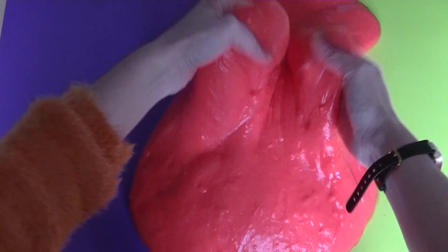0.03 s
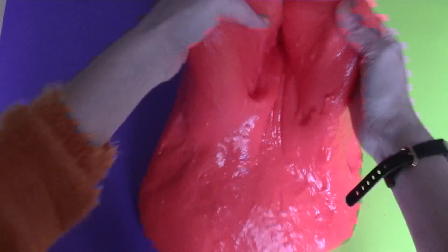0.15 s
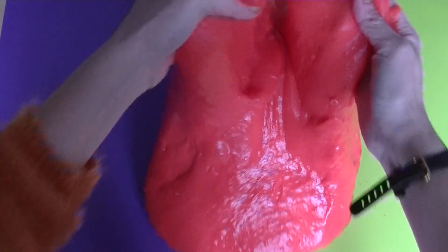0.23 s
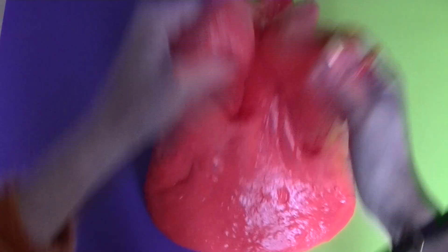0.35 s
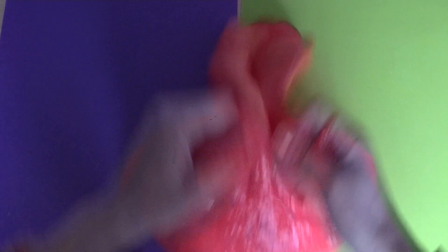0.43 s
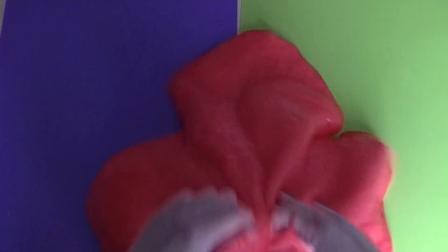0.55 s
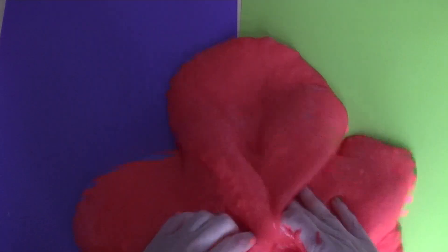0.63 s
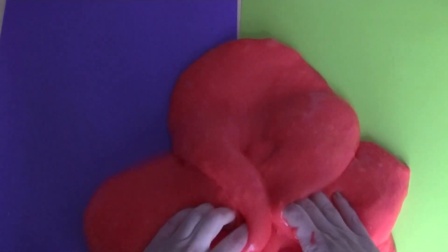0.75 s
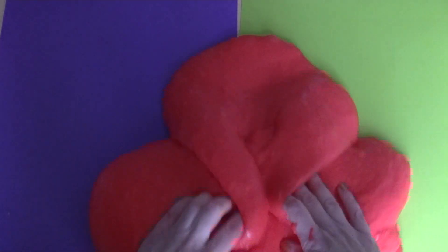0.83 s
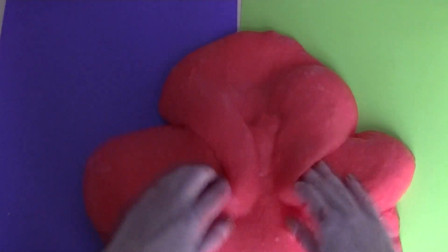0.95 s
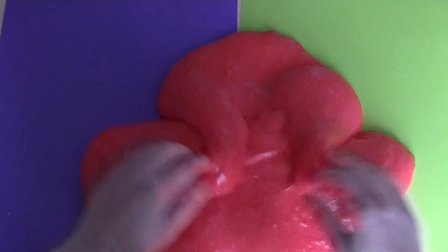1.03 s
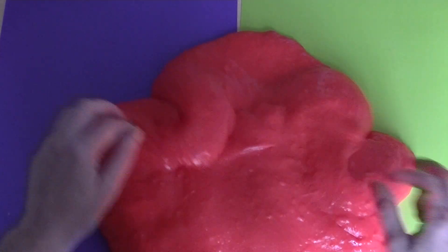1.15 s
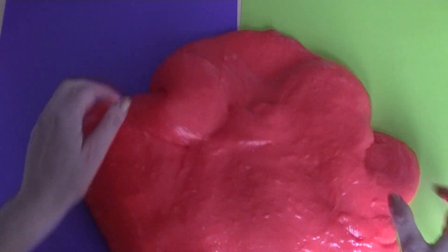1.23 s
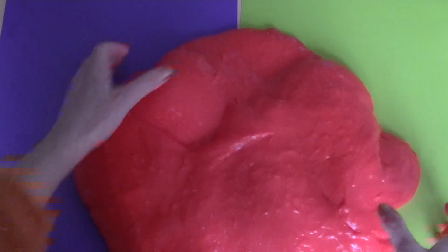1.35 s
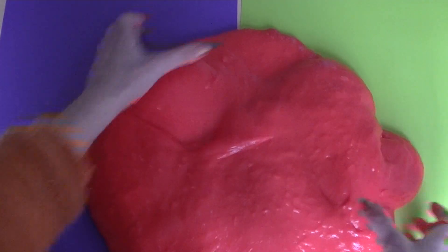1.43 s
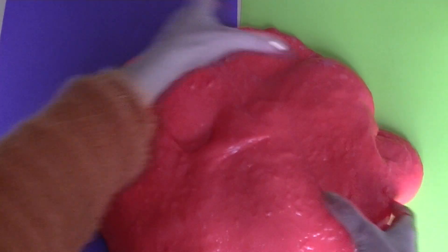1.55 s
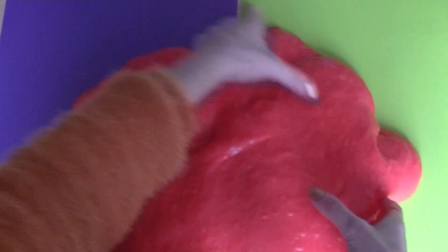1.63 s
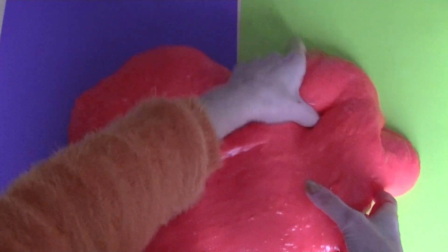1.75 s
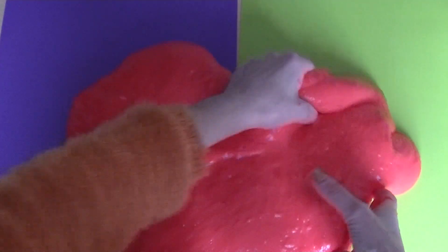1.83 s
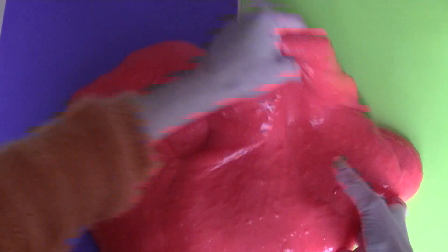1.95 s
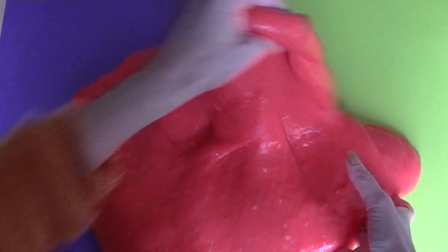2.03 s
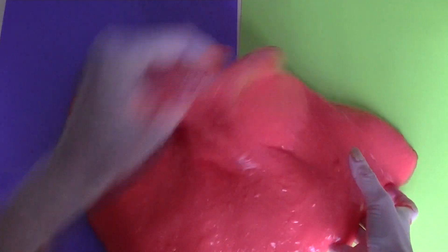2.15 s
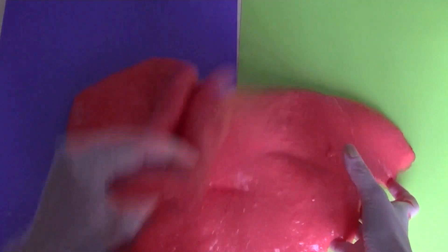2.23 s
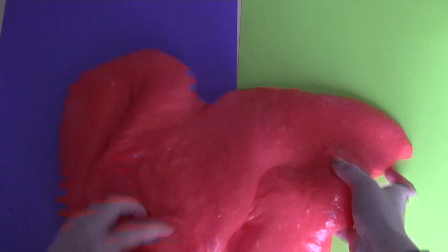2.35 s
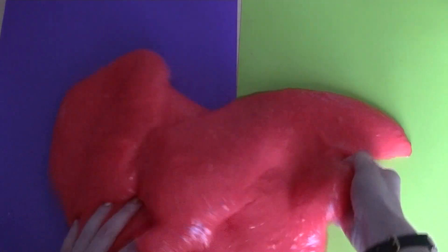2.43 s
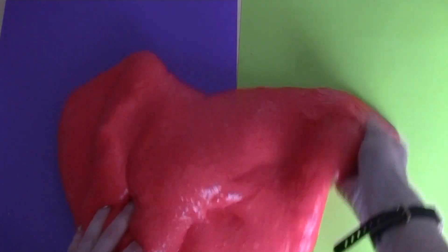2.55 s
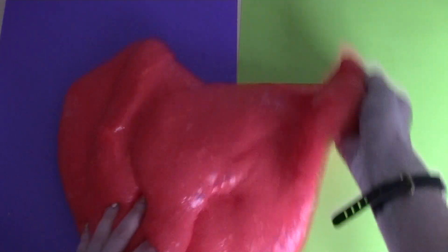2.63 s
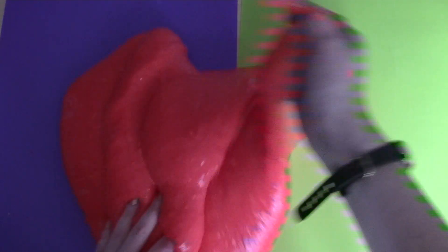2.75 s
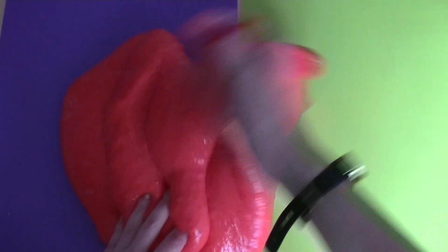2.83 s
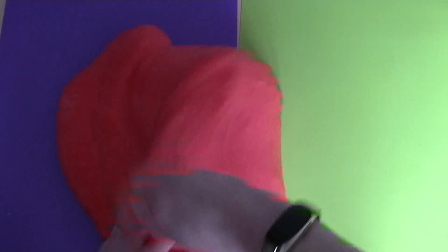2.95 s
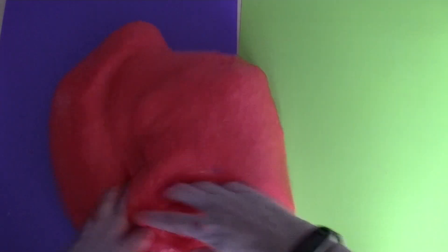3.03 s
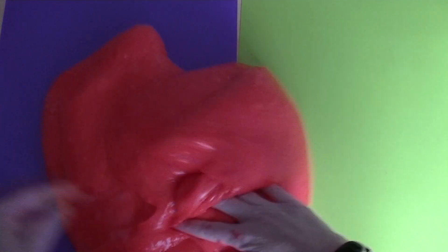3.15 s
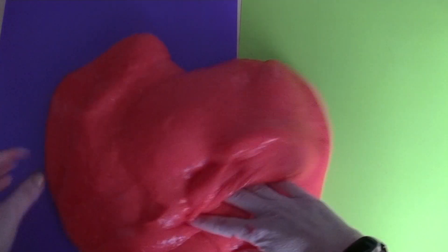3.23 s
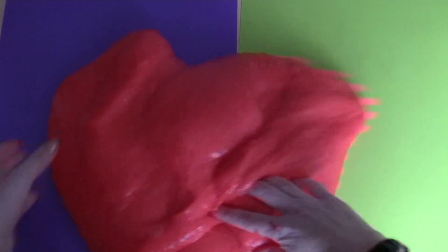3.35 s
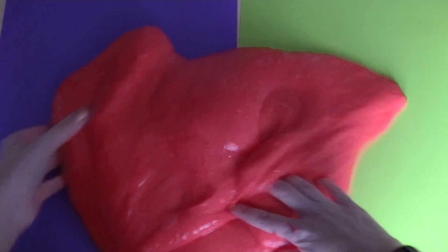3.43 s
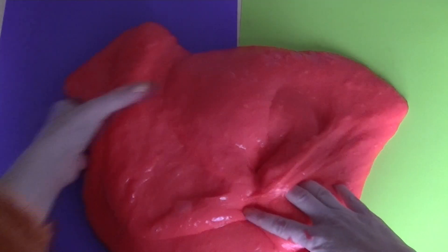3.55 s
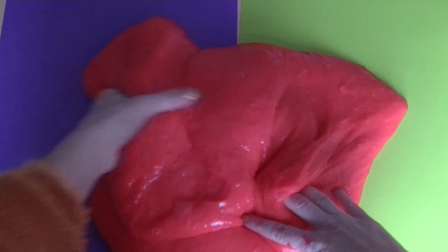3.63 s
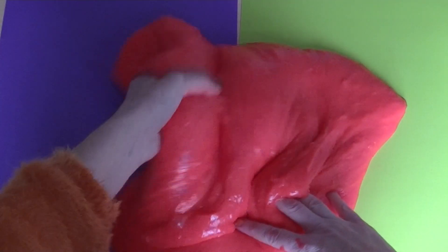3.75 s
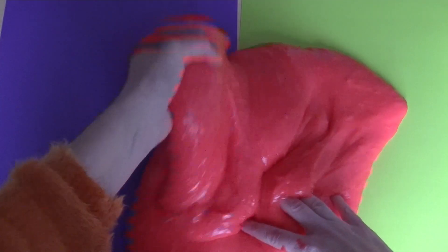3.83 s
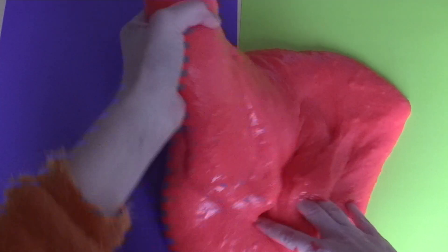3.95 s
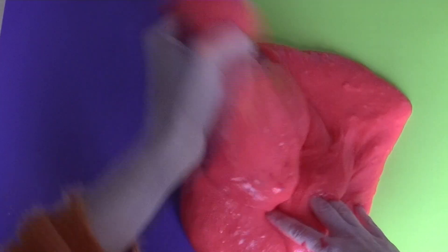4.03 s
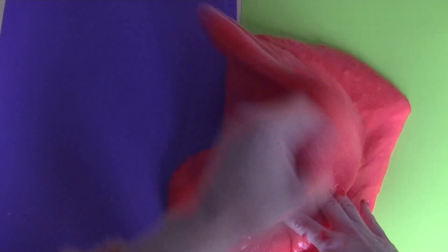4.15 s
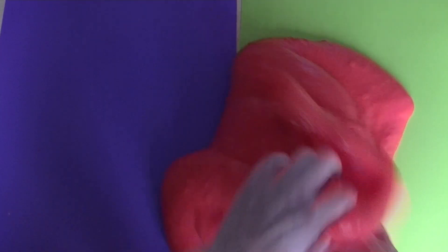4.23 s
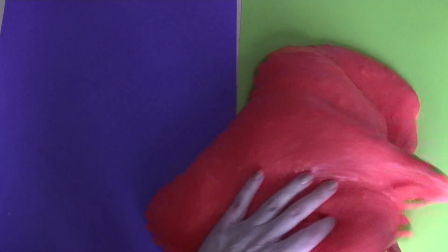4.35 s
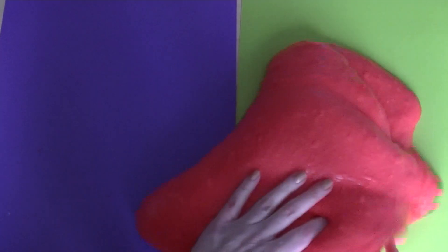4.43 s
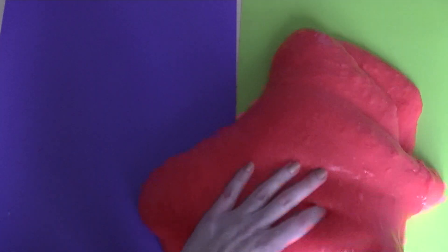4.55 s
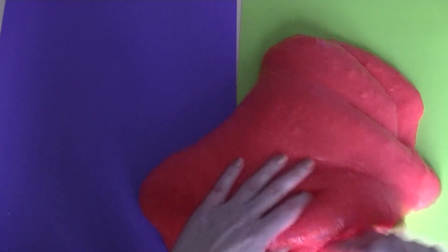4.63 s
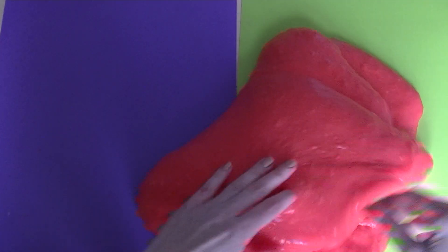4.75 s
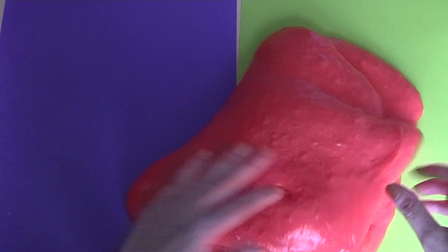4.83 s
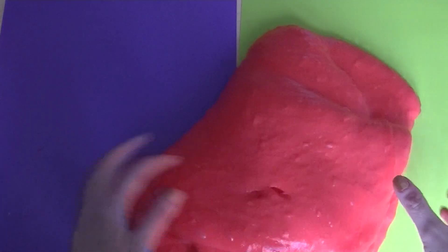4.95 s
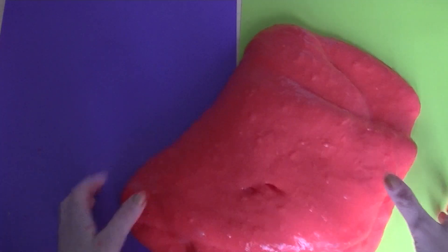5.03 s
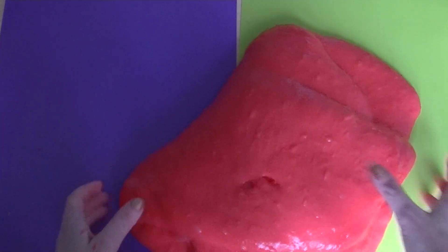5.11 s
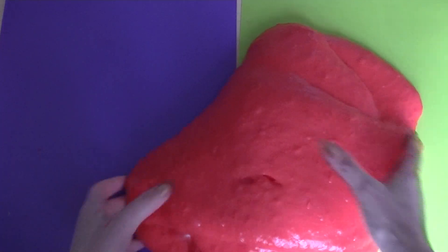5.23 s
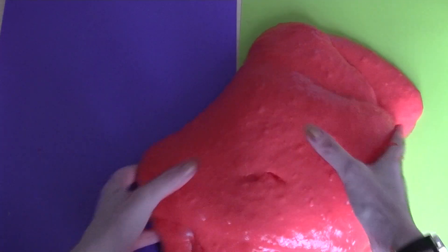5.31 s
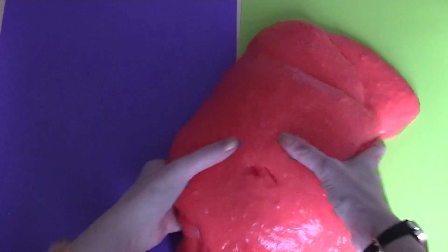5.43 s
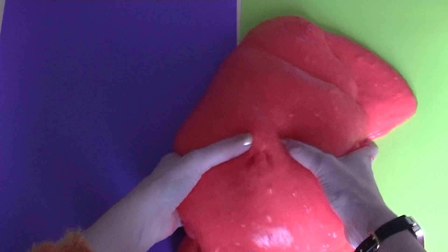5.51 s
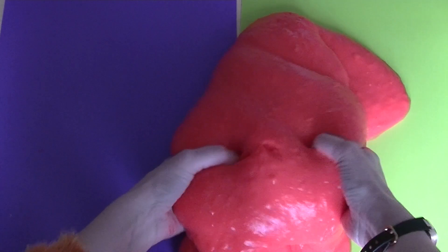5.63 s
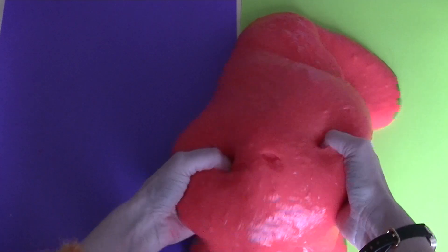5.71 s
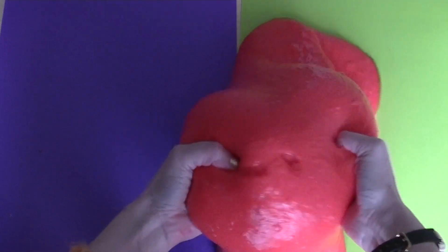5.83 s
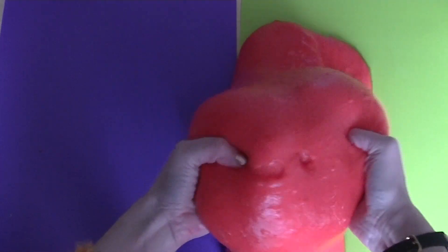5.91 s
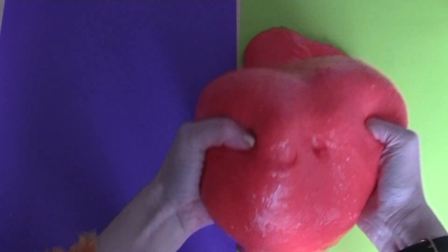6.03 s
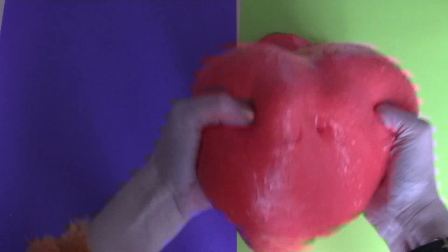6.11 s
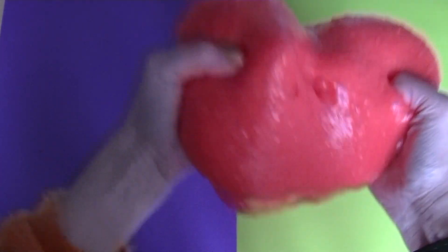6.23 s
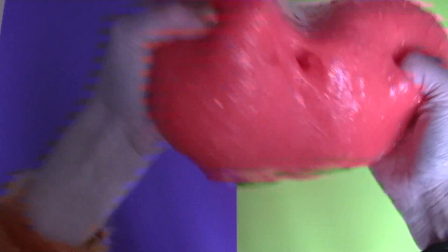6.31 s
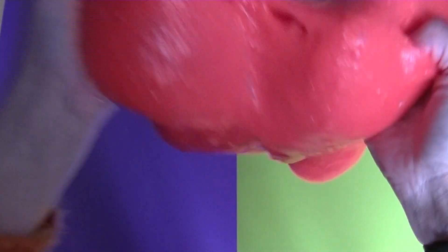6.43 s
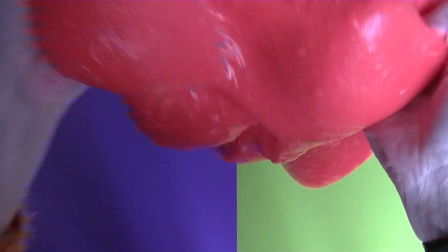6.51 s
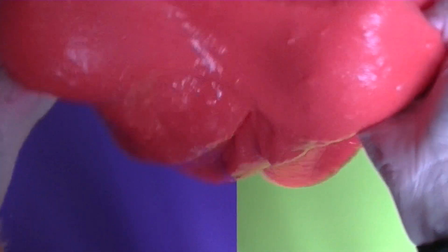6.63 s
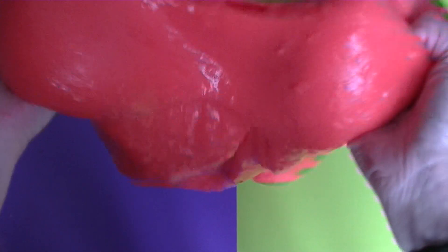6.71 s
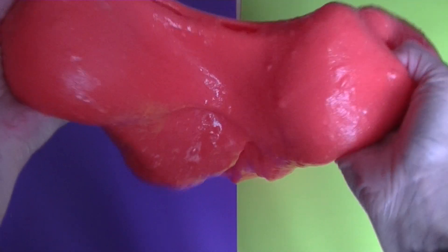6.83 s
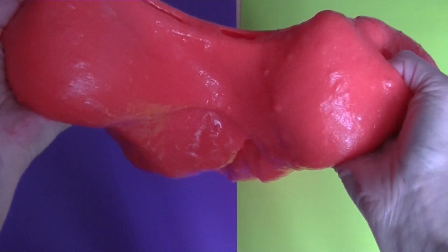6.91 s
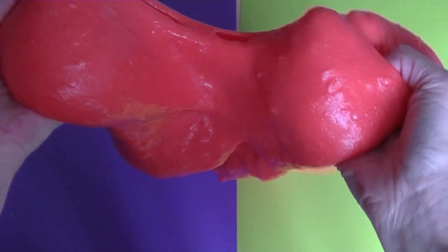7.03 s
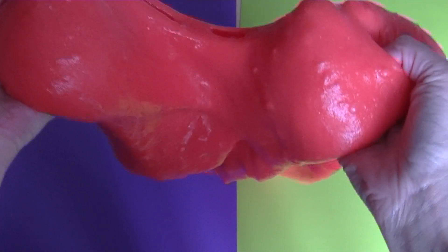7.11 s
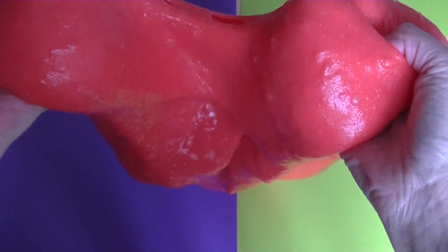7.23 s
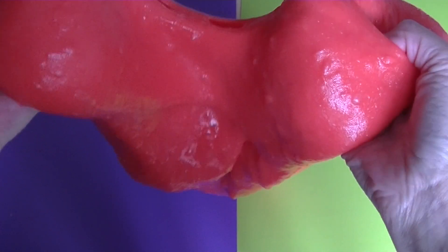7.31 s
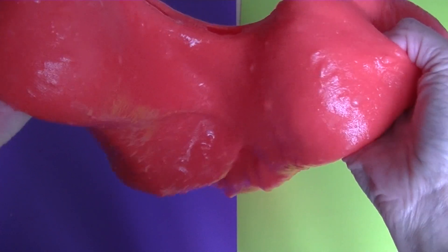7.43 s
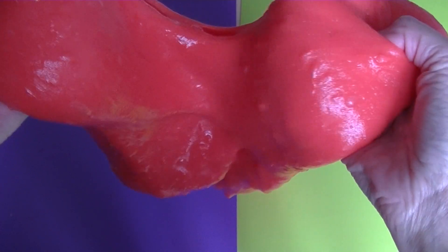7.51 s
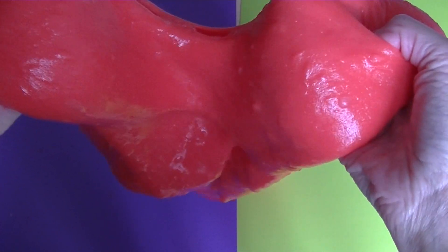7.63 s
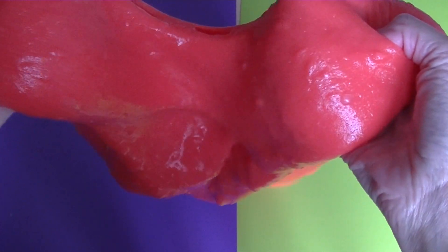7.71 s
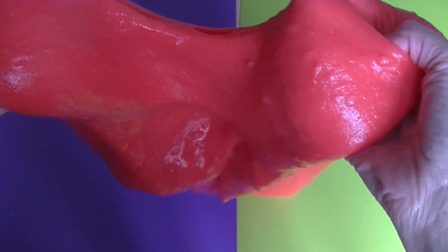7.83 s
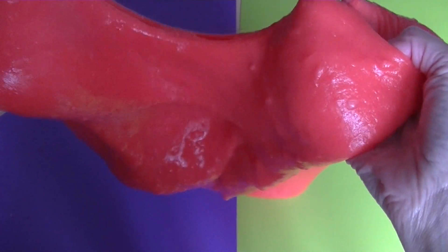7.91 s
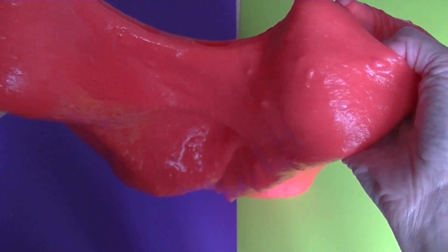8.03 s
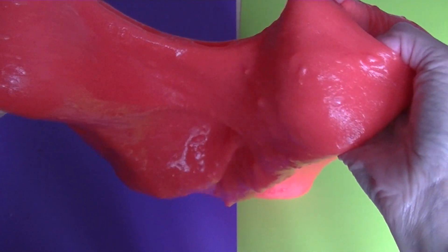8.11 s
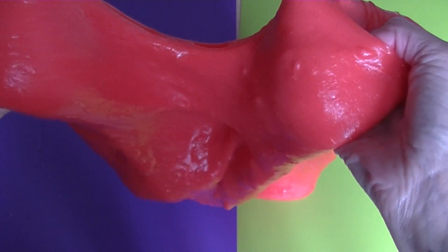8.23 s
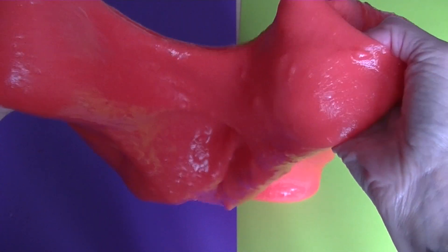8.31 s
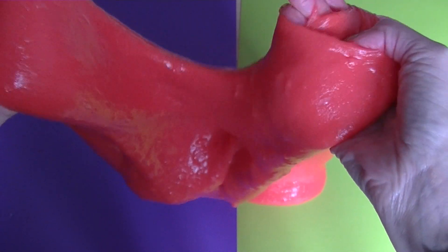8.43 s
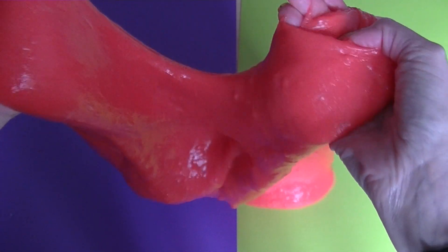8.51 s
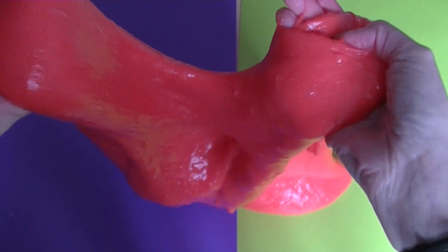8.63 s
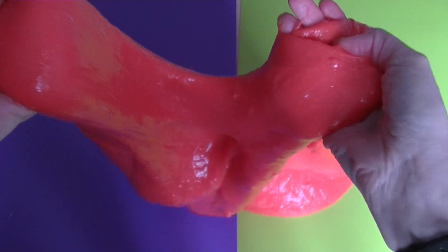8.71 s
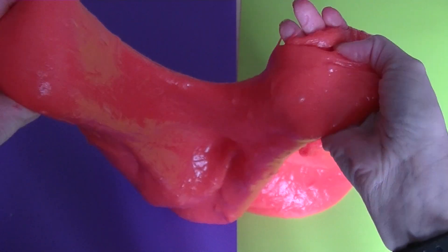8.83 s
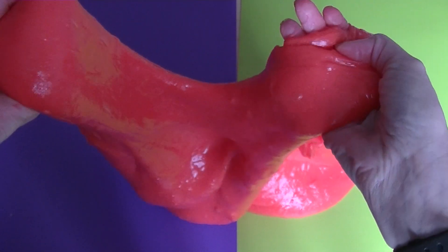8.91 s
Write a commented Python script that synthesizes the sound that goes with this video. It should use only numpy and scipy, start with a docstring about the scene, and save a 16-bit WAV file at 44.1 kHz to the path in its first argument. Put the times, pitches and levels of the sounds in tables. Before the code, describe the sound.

A big lump of wet slime is worked by two hands on a table, close up in a small, slightly reverberant room with faint still air and low hum. Soft crackle and a short airy spurt open it; at 0.56 s two sharp pops snap with a dull plop. From 1.3 to 1.9 s come bright pops, low plops and dense squelchy fizz with hissing air. At 2.37 s a large blister bursts, the loudest crack, with a short dry thump. Small ticks follow, then a hollow plop, pops and wet fizz at 3.3-3.6 s. Another snapping cluster comes at 4.1-4.5 s, then a calmer gap. Sticky fizz and pops return at 5.1-5.7 s. From 6.3 s the lump is lifted: mostly fine ticks, scattered tiny pops and light crackles, a few soft plops until 6.9 s, closer and drier. A very faint thin whine comes and goes around 7.7-8.5 s; sparse ticks continue to about 8.9 s.

```python
"""Two hands stretch, fold and squeeze a big lump of wet slime on a table in a small room.
From the start, air pockets tear and ring, folds close with low plops, and pressed skin fizzes as strings of
tiny damped resonances; at 2.37 s a large blister bursts in several modes with a dry thump. Ticks, stray pops
and hissing spurts of air follow the hands, and a thin whine comes and goes from about 7.7 s.
Shaped noise and steady sines make the still air and faint hum beneath; a wall echo and noise tail, the room."""
import sys
import numpy as np
from scipy import signal
from scipy.fft import rfft, irfft
from scipy.io import wavfile

SR = 44100
rng = np.random.default_rng(int(sys.argv[2]) if len(sys.argv) > 2 else 0)


def file_out(sig):
    """Save sig as 16-bit WAV at sys.argv[1]."""
    # one column per channel
    cols = np.atleast_2d(sig).T
    # limit, then scale
    lim = np.clip(cols, -1, 1)
    pcm = np.round(lim * 32767).astype(np.int16)
    wavfile.write(sys.argv[1], SR, pcm)


N = 395577
TIME = np.arange(N) / SR
CUTOFF_HZ = 15900
# noise bands 0.4 octave wide
EDGES = 28 * 2 ** (np.arange(24) * .4)
CENTRES = np.sqrt(EDGES[1:] * EDGES[:-1])
BANK = [signal.butter(2, band, "band", fs=SR, output="sos") for band in zip(EDGES, EDGES[1:])]

# The large blister giving way in two steps. Each row: start in seconds, level in dB.
BURST = [(2.3716, -8), (2.373, 0.5)]
# Spectrum of tearing skin. Each row: frequency in Hz, spectral level in dB.
SNAP = [(150, -11), (500, -9), (1100, -0.5), (1700, 4), (2500, 8.5), (4000, 12.5), (5500, 2.5), (7500, 9),
        (10000, 0.5), (16000, -8)]
# Tension in the skin, which sets off stray pops, ticks and fizz. Each row: time in seconds, tension in dB.
STRETCH = [(0, 0), (0.6, -0.5), (0.85, -6), (1.25, -10), (2, 2), (2.85, 0.5), (3.3, -12), (4, 0),
           (4.6, -4.5), (5.05, -19), (6, -3), (6.7, 5.5), (7.6, -2.5), (8.3, 1.5), (8.9, 5)]


def from_db(db):
    """A level in decibels is twenty times the logarithm of an amplitude ratio; this inverts it."""
    return 10 ** (np.asarray(db) / 20)


def rms_one(x):
    """Dividing by the root of the mean power normalises a signal to unit rms."""
    return x / np.sqrt(np.mean(x ** 2) + 1e-20)


def at_hz(points, hz):
    """Pitch is logarithmic in frequency, so a table is interpolated on a log-frequency axis."""
    f, value = np.transpose(points)
    return np.interp(np.log(hz), np.log(f), value)


def dying(t, t60):
    """Linear damping gives exponential decay: 60 dB in t60 seconds."""
    return from_db(-60 * t / max(t60, 1e-4))


def add(track, s, sound):
    """Superposition: a sound is summed into the track at time s."""
    i = round(s * SR)
    track[i:i + len(sound)] += sound[:N - i]


def coloured(x, spectrum):
    """A folded cepstrum yields the causal minimum-phase filter of a given magnitude spectrum."""
    size = 4096
    hz = np.maximum(np.fft.rfftfreq(size, 1 / SR), 1)
    cepstrum = irfft(np.log(from_db(at_hz(spectrum, hz))))
    fold = np.r_[1, np.full(size // 2 - 1, 2), np.zeros(size // 2)]
    response = irfft(np.exp(rfft(cepstrum * fold)))[:size // 2]
    return signal.oaconvolve(x, response)[:len(x)]


def cavity(t, hz, t60, rise_cycles, glide):
    """Cavity resonance: the pitch glides up or down as the hole changes shape; the envelope peaks at 1."""
    swell = (1 - np.exp(-t * hz / rise_cycles)) * dying(t, t60)
    pitch = hz * (1 + glide * np.minimum(t / t60, 1))
    return swell / swell.max() * np.sin(2 * np.pi * np.cumsum(pitch) / SR)


def pops(ring_db=-5.0, partner_db=-9.5, snap_db=14.5, snap_t60=0.0022, flap_db=-13.5, flap_t60=0.011,
         flap_span=1.575, glide=0.048, glide_spread=0.52, low_cut_hz=1600, lag_s=0.000008):
    """Impulsive excitation of a cavity: the skin snaps, the pocket rings, and the wet rim flaps briefly."""
    # Air pockets popping one by one, from hollow low pops to tiny bright ones.
    # Each row: start in seconds, level in dB before the trims of ring, snap and flap,
    # cavity pitch in Hz, snap of the tearing skin in dB re that level before its trim.
    pockets = [(0.059, -26, 4280, -27), (0.2013, -35, 2450, -34.5), (0.4967, -27.5, 3620, -18.5),
               (0.56, -10, 2770, -9.5), (0.5646, -15, 3950, -15), (0.6856, -33, 3400, -16),
               (0.734, -32, 2040, -14), (1.3273, -10.5, 3340, -34), (1.352, -15.5, 4060, -42),
               (1.4466, -16.5, 4160, -22), (1.451, -14.5, 4130, -43), (1.855, -26, 6860, -14.5),
               (1.9245, -31, 1570, -32), (2.121, -35, 2560, -12), (2.3433, -25, 1280, -12),
               (2.3602, -23.5, 4150, -6.5), (2.786, -32, 6460, -25), (2.8895, -34, 5000, -36),
               (3.0067, -25.5, 2100, -14.5), (3.0582, -22, 3870, 0), (3.058, -17, 13500, -30),
               (3.1745, -27, 3100, -19), (3.3829, -11.5, 3520, -43), (3.3964, -12.5, 3600, -40),
               (3.737, -35.5, 4250, -5.5), (3.8612, -26.5, 3400, -33), (4.009, -29, 3970, -42),
               (4.083, -29, 3430, -33), (4.139, -18.5, 3450, -32), (4.3235, -10, 3750, -15),
               (4.323, -20, 13400, -25), (4.3849, -19.5, 2730, -12.5), (4.4023, -17.5, 4200, -15),
               (4.4746, -19.5, 4050, -21), (4.4805, -21, 4160, -20), (4.5012, -24.5, 3740, -34),
               (4.7715, -29.5, 3370, -29), (5.1083, -16, 3200, -32), (5.1185, -18, 3400, -22),
               (5.125, -22, 4200, -24), (5.134, -22, 3300, -30), (5.1485, -23, 3700, -35),
               (5.2782, -25.5, 3840, -17), (5.6211, -27.5, 8450, -15), (6.298, -34, 6000, -9),
               (6.397, -32, 5950, -28), (6.4046, -30, 5000, -28), (6.5393, -30, 3600, -35.5),
               (6.6302, -25.5, 7240, -15), (6.782, -40, 2360, -0.5), (6.8113, -29, 6040, -24),
               (6.9055, -18.5, 3980, -19), (6.958, -34, 4480, -5), (7.0006, -34.5, 13700, -10),
               (7.064, -36, 1250, -27), (7.106, -26.5, 2600, -14), (7.1633, -40, 6250, -2),
               (7.2867, -36, 8400, -5.5), (7.294, -32.5, 3850, -15), (7.3622, -25, 7250, -43),
               (7.449, -37, 2120, -21), (7.5577, -31, 2200, -23), (7.581, -19.5, 4550, -33),
               (7.8136, -34.5, 6860, -11), (7.939, -33.5, 7700, -12), (7.966, -37.5, 2410, -14),
               (8.212, -32.5, 7060, -21), (8.471, -27.5, 4050, -23.5), (8.5042, -29.5, 7400, -32),
               (8.8787, -25, 4440, -32), (8.924, -29.5, 3190, -13)]
    pop_cycles = 16.2  # cycles to fall 60 dB, so small pockets die sooner
    t = np.arange(SR // 20) / SR
    rings, snaps, flaps, place = np.zeros((4, N))
    for s, db, hz, tear_db in [*pockets, *stray_pops()]:
        t60 = pop_cycles / hz
        # the flapping rim excites a broad band around the pocket's own pitch
        band = np.clip([hz / max(flap_span, 1.1), hz * flap_span], 200, [CUTOFF_HZ - 500, CUTOFF_HZ])
        rim_filter = signal.butter(3, band, "band", fs=SR, output="sos")
        flap = signal.sosfilt(rim_filter, rng.standard_normal(len(t)))
        fade = dying(t, flap_t60)
        flap = flap * fade * np.linalg.norm(fade) / np.linalg.norm(flap * fade)
        bend = glide + glide_spread * (2 * rng.random() - 1)
        ring = cavity(t, hz, t60, rise_cycles=0.85, glide=bend)
        # an uneven pocket has further modes around its main one
        for ratio in rng.uniform([.55, 1.2], [.85, 1.9]):
            partner = cavity(t, min(hz * ratio, CUTOFF_HZ), t60 * 0.8, rise_cycles=0.037, glide=bend)
            ring = ring + from_db(partner_db) * partner / ratio
        add(rings, s, from_db(db + ring_db) * ring)
        add(snaps, s, from_db(db + tear_db + snap_db) * rip(snap_t60))
        add(flaps, s, from_db(db + flap_db) * flap)
        # a pocket under the left or the right hand reaches that side a little earlier
        place[round(s * SR):][:len(t)] = lag_s * SR / 2 * rng.choice([-1, 1])
    rings = signal.sosfilt(signal.butter(2, low_cut_hz, "high", fs=SR, output="sos"), rings + 1e-18)
    tears = coloured(snaps, SNAP) + flaps
    # a slope times a small lag approximates the shift in time
    return rings, tears, place * np.gradient(rings + tears)


def stray_pops():
    """Random failure under stress: stray pockets pop more often and louder in taut skin; rows as in pops."""
    rate_per_s, stray_db, spread_db = 9, -39, -1  # rate and level at 0 dB of tension
    level_follows = 0.41  # share of the tension that the level follows
    snap_db, low_hz, high_hz = -12, 2200, 8900  # mean snap, range of pitches
    moment, luck, pitch, size, snap = rng.random((400, 5)).T
    s = moment * TIME[-1]
    tension = np.interp(s, *np.transpose(STRETCH))
    happens = luck < rate_per_s * from_db(tension) * TIME[-1] / len(s)
    db = stray_db + level_follows * tension + spread_db * (2 * size - 1)
    hz = low_hz * (high_hz / low_hz) ** pitch
    return list(np.c_[s, db, hz, snap_db + 10 * (snap - .5)][happens])


def rip(t60):
    """An impulsive rupture has a flat spectrum: a brief irregular burst of unit energy."""
    size = 384
    burst = rfft(rng.standard_normal(size) * dying(np.arange(size) / SR, t60))
    return irfft(burst / np.abs(burst))


def blister(crack_db=-0.5, crack_t60=0.0066, top_hz=8500):
    """Modal superposition: a large thin blister cracks open and rings in several damped modes."""
    # Modes of its cavity. Each row: frequency in Hz, level in dB re the burst, decay time t60 in seconds.
    cavity_modes = [(1614, -21, 0.016), (1860, -11.5, 0.018), (2585, -10, 0.016), (3200, -14, 0.0092),
                    (3850, 2, 0.0056), (4500, -10, 0.0049), (5310, -16.5, 0.0021), (8000, -30, 0.0046)]
    t, out = np.arange(SR // 10) / SR, np.zeros(N)
    for s, db in BURST:
        modes = sum(from_db(level) * dying(t, t60) * np.sin(2 * np.pi * hz * t)
                    for hz, level, t60 in cavity_modes)
        crack = np.zeros(len(t))
        add(crack, 0, from_db(crack_db) * rip(crack_t60))
        add(out, s, from_db(db) * (modes + coloured(crack, SNAP)))
    out = signal.sosfilt(signal.butter(2, min(top_hz, CUTOFF_HZ), fs=SR, output="sos"), out + 1e-18)
    # so small a source radiates little bass
    return signal.sosfilt(signal.butter(6, 1300, "high", fs=SR, output="sos"), out)


def thump(db=-27.0, t60=0.0092):
    """A one-sided decaying pulse has mostly low frequencies: a short dry thump with the blister's burst."""
    out = np.zeros(N)
    add(out, BURST[-1][0], from_db(db) * dying(np.arange(SR // 20) / SR, t60))
    return out


def kneading():
    """Independent sources add in power: pressing and peeling break bubbles, and held skin keeps fizzing."""
    # Hands press or peel the lump. Each row: start in seconds, hold in seconds, then levels in dB, before
    # the trims in wet_skin, of the squelch of the bulk, fizz of small bubbles and sizzle of the finest.
    presses = [(0.0, 0.3, -71, -53.5, -59), (1.44, 0.36, -57.5, -45.5, -52), (1.87, 0.33, -70.5, -58, -57),
               (2.62, 0.094, -70.5, -56, -58), (3.41, 0.23, -58.5, -47.5, -50),
               (3.82, 0.24, -75, -55.5, -74), (5.12, 0.16, -59, -43.5, -45.5),
               (5.35, 0.17, -57.5, -49.5, -51.5), (5.58, 0.1, -61, -51.5, -53.5),
               (5.82, 0.38, -71, -57.5, -61), (6.53, 0.1, -67.5, -54, -69), (6.85, 0.14, -63.5, -57, -59),
               (8.49, 0.47, -90, -74, -58)]
    attack_s, release_s = 0.011, 0.095  # linear rise, time constant of the relaxation
    held_db = np.c_[[-74, -60, -65.5]]  # squelch, fizz, sizzle at 0 dB of tension, before the same trims
    held_follows = 0.23  # share of the tension that the held levels follow
    tension = np.interp(TIME, *np.transpose(STRETCH))
    power = from_db(held_db + held_follows * tension) ** 2
    for s, hold, *levels_db in presses:
        t = np.maximum(TIME - s, 0)
        effort = np.minimum(t / attack_s, 1) * np.exp(-np.maximum(t - hold, 0) / release_s)
        power = power + np.outer(from_db(levels_db), effort) ** 2
    return wet_skin(*np.sqrt(power))


def wet_skin(squelch, fizz, sizzle, squelch_db=1.0, fizz_db=-3.5, sizzle_db=-4.5):
    """Bubble pitch rises as size falls: large, small and very fine bubbles, each at its own strength."""
    # Spectra of the three sizes. Each row: frequency in Hz, spectral level in dB.
    large = [(100, -13), (200, -3.5), (400, -2), (700, -7.5), (1200, -5), (1800, -14), (3000, -29)]
    small = [(900, -36.5), (1500, -10), (2200, -3.5), (3200, -5), (4100, -0.5), (5000, -8), (7000, -29.5)]
    finest = [(3500, -18), (5000, 0), (6300, 4), (8000, 1.5), (10000, -11), (13000, -15.5), (16000, -12)]
    return (squelch * from_db(squelch_db) * bubbles(large, per_s=4000, spread_db=2.0, cycles=8.6)
            + fizz * from_db(fizz_db) * bubbles(small, per_s=12000, spread_db=2.5, cycles=9.1)
            + sizzle * from_db(sizzle_db) * bubbles(finest, per_s=9100, spread_db=1.5, cycles=7.0))


def bubbles(spectrum, per_s, spread_db, cycles):
    """Random impulses drive damped resonators: tiny bubbles each ring a few cycles; rms 1 overall."""
    count = 24
    clicks = random_clicks(N, per_s, spread_db)
    dealt, out = rng.integers(0, count, N), np.zeros(N)  # each click goes to one resonator
    for k, hz in enumerate(np.geomspace(spectrum[0][0], min(spectrum[-1][0], CUTOFF_HZ), count)):
        r = dying(1 / SR, cycles / hz)
        poles = [1, -2 * r * np.cos(2 * np.pi * hz / SR), r * r]
        out += hz * signal.lfilter([1, 0, -1], poles, clicks * (dealt == k) + 1e-18)
    return rms_one(coloured(out, spectrum))


def random_clicks(size, per_s, spread_db):
    """A Poisson-like process: clicks at random moments, most small, a few large."""
    sizes = from_db(spread_db * np.minimum(rng.exponential(1, size), 5)) * rng.choice([-1, 1], size)
    return sizes * (rng.random(size) < per_s / SR)


def spurts(per_s=7000, spread_db=4.0):
    """Band-limited shot noise: escaping air bursts a string of tiny films, coloured by the gap it passes."""
    # Air squeezed through wet folds. Each row: time of the top in seconds, rms level in dB before the
    # envelope, centre in Hz, width in octaves, time constant of swell and fade in seconds.
    squeezes = [(0.213, -41.5, 3350, 1.2, 0.014), (1.432, -44.5, 4350, 0.34, 0.014),
                (1.52, -41, 4800, 0.85, 0.041), (1.576, -34, 4800, 0.97, 0.025),
                (1.772, -38.5, 3040, 1.3, 0.025), (2.81, -52, 6300, 0.49, 0.04),
                (3.412, -36, 3380, 1.2, 0.013), (3.45, -43.5, 3400, 1.3, 0.025),
                (3.626, -48, 2290, 1.3, 0.03), (3.656, -50.5, 5200, 0.27, 0.045),
                (4.165, -49, 3540, 0.64, 0.031), (5.21, -41.5, 4100, 1.25, 0.035),
                (5.49, -45.5, 2530, 0.83, 0.039), (6.119, -52, 3200, 1.6, 0.048),
                (6.555, -53, 3440, 1.3, 0.016), (6.636, -42, 2400, 2.2, 0.014),
                (6.795, -46.5, 2450, 1.6, 0.013), (6.902, -47, 2200, 2.8, 0.016),
                (7.588, -39, 5200, 0.69, 0.0043)]
    out = np.zeros(N)
    for s, db, hz, octaves, swell in squeezes:
        lead = min(5 * swell, s)
        t = np.arange(-lead, 6 * swell, 1 / SR)
        band = np.clip(hz * 2 ** (np.array([-.5, .5]) * octaves), 100, CUTOFF_HZ)
        gap_filter = signal.butter(2, band, "band", fs=SR, output="sos")
        hiss = signal.sosfilt(gap_filter, random_clicks(len(t), per_s, spread_db))
        add(out, s - lead, from_db(db) * rms_one(hiss) * np.exp(-np.abs(t) / swell))
    return out


def plops(slap_rise_s=0.0014, low_cut_hz=80):
    """Cavity resonance with an impact: a fold closes over air with a hollow note and a pitch-scaled slap."""
    # Folds landing and large soft pockets closing.
    # Each row: start in seconds, ring level in dB, pitch in Hz, level of the dull slap in dB.
    folds = [(0.568, -38.5, 335, -36), (1.243, -42, 338, -65), (1.334, -43, 355, -48.5),
             (1.449, -42.5, 392, -52), (1.476, -44, 236, -54), (1.755, -48.5, 350, -53.5),
             (2.374, -38, 347, -38), (2.395, -40, 600, -35.5), (2.862, -53, 186, -65),
             (3.005, -61, 620, -44), (3.06, -57, 395, -52), (3.337, -30, 336, -49),
             (3.387, -41, 215, -47.5), (4.323, -36, 562, -46.5), (4.385, -52, 290, -48),
             (4.443, -43.5, 452, -55), (5.135, -45.5, 210, -49.5), (5.172, -55, 169, -58),
             (5.63, -55, 1093, -52), (5.665, -44, 1034, -48), (5.673, -38, 430, -52),
             (6.66, -41.5, 288, -44.5), (6.663, -57, 120, -53), (6.86, -45, 198, -47),
             (6.874, -54, 115, -54)]
    # Spectrum of the slap. Each row: multiple of the plop's pitch, spectral level in dB.
    slap_colour = [(.15, -36), (.3, -13), (.5, -1), (1.001, 5.5), (1.8, 0), (3, -12), (6, -28.5)]
    plop_cycles, slap_t60 = 16.2, 0.18  # cycles for the note to fall 60 dB; decay of the slap in seconds
    t, out = np.arange(SR // 3) / SR, np.zeros(N)
    for s, db, hz, slap_db in folds:
        spectrum = [(hz * k, level) for k, level in slap_colour]
        slap = rms_one(coloured(rng.standard_normal(len(t)), spectrum))
        slap = slap * dying(t, slap_t60) * (1 - np.exp(-t / slap_rise_s))
        note = cavity(t, hz, plop_cycles / hz, rise_cycles=0.86, glide=.03)
        add(out, s, from_db(db) * note + from_db(slap_db) * slap)
    return signal.sosfilt(signal.butter(4, low_cut_hz, "high", fs=SR, output="sos"), out + 1e-18)


def crackle(db=-62.5, per_s=50, clump_db=10.5, clump_rate=22):
    """Clustered fracture noise: taut skin tears in wet ticks, more and louder as the tension grows."""
    # Spectrum of single ticks. Each row: frequency in Hz, spectral level in dB.
    tick = [(1300, -7), (2200, -6), (4000, 7), (5500, 0.5), (7500, 5), (12000, -19.5)]
    tension = np.interp(TIME, *np.transpose(STRETCH))
    chance = np.clip(rng.standard_normal(N // 100), -2, 2)
    clumps = from_db(clump_db * np.interp(TIME * clump_rate, np.arange(len(chance)), chance))
    tick_rate = per_s * clumps * from_db(tension)
    return from_db(db + tension / 2) * bubbles(tick, per_s=tick_rate, spread_db=3.0, cycles=10.0)


def stereo_bands(size, width):
    """Mid-side decomposition: the side level sets how diffuse each band of noise is between the channels."""
    white = rng.standard_normal((2, 2, size))
    for k, (hz, sos) in enumerate(zip(CENTRES, BANK)):
        mid, side = signal.sosfilt(sos, white[k % 2])  # neighbouring bands use independent noise
        yield hz, mid + from_db(at_hz(width, hz)) * side * np.array([[1], [-1]])


def room(x, build_s=0.0046, wall_db=-22.5, wall_lag_s=0.0153):
    """Convolution with a room response: direct sound, an echo off the nearest wall and a diffuse tail."""
    # Decay of the tail. Each row: frequency in Hz, t60 in seconds.
    decay = [(100, .5), (400, 0.9), (1500, 0.4), (4000, 0.39), (8000, 0.37), (15000, 0.2)]
    # Strength of the tail. Each row: frequency in Hz, level in dB re direct, before the distance level.
    strength = [(100, -3.5), (400, -8.5), (1000, -2), (1500, -1.5), (2500, -3), (4000, -6), (8000, -4.5),
                (15000, -10)]
    # Stereo width of the tail. Each row: frequency in Hz, side against mid in dB.
    tail_width = [(60, -14), (125, 3.5), (250, -4), (500, -10.5), (1000, -7.5), (2000, -9), (4000, -21.5),
                  (8000, -37), (15000, -37)]
    # The lump is lifted closer to the listener and the room recedes.
    # Each row: time in seconds, level in dB sent to the wall echo and tail.
    distance = [(0, 1), (2.3, 1), (4.3, -1.5), (5.7, 1), (6.4, -1.5), (7.2, -2.5), (8.9, -8)]
    t, response = np.arange(SR * 3 // 4) / SR, 0
    for hz, noise in stereo_bands(len(t), tail_width):
        tail = dying(t, at_hz(decay, hz)) * (1 - np.exp(-t / build_s))
        response = response + from_db(at_hz(strength, hz)) * noise * tail / np.sqrt(np.sum(tail ** 2))
    send = x * from_db(np.interp(TIME, *np.transpose(distance)))
    echo = np.zeros(N)
    add(echo, wall_lag_s, from_db(wall_db) * send)
    return x + echo + signal.oaconvolve(send[None], response, axes=1)[:, :N]


def background(air_db=-58.5, whine_hz=3340):
    """Broadband noise plus pure tones: still air of the room, a faint steady hum and a thin whine."""
    # Spectrum of the still air. Each row: frequency in Hz, relative spectral level in dB.
    air_colour = [(18, -43), (30, -63), (90, -8.5), (239, 1.5), (355, 0.5), (449, -9), (937, -9),
                  (1160, -12), (2120, -6.5), (2480, -4.5), (4080, -11.5), (5040, -19), (7870, -12),
                  (14800, -18.5), (16000, -30)]
    # Stereo width of the still air. Each row: frequency in Hz, side against mid in dB.
    air_width = [(60, 5), (110, 3), (200, -0.5), (380, 5), (700, 6.5), (1290, 3), (2380, -4), (4400, -13),
                 (8120, -57), (15000, -32)]
    # Steady hum. Each row: frequency in Hz, rms level in dB.
    hum_tones = [(50, -85), (100, -106.5), (250, -73.5)]
    # The whine comes and goes.
    # Each row: time of the top in seconds, rms level there in dB, half length in seconds (to 1/e).
    whine_swells = [(7.75, -66, 0.11), (8.132, -63, 0.034), (8.42, -70, 0.15)]
    air = rms_one(sum(from_db(at_hz(air_colour, hz)) * noise for hz, noise in stereo_bands(N, air_width)))
    whine = sum(from_db(db) * np.exp(-((TIME - s) / half) ** 2) for s, db, half in whine_swells)
    tones = [(hz, from_db(db)) for hz, db in hum_tones] + [(whine_hz, whine)]
    hum = sum(np.sqrt(2) * gain * np.sin(2 * np.pi * (hz * TIME + rng.random())) for hz, gain in tones)
    return from_db(air_db) * air + hum


def scene(pan_db=0.11, beamed=0.32, beamed_fizz=0.38):
    """Directivity: slime just left of centre beams part of its sound straight ahead, the rest into the room."""
    rings, tears, off_centre = pops()
    fizz = spurts() + kneading()
    slime = (1 - beamed) * rings + (1 - beamed_fizz) * fizz + tears + blister() + plops() + crackle()
    # open pockets and the top skin send this part to the listener without reverberation
    direct = beamed * rings + beamed_fizz * fizz + thump() + off_centre * np.array([[1], [-1]])
    return (room(slime) + direct) * from_db([[pan_db], [-pan_db]]) + background()


def record(dry):
    """Clipping and band limitation: peaks stop at full scale, then a steep low-pass cuts the top."""
    low_pass = signal.ellip(10, .1, 80, CUTOFF_HZ, fs=SR, output="sos")
    return signal.sosfilt(low_pass, np.clip(dry, -1, 1))


dry = scene()
out = record(dry)
file_out(out)
```